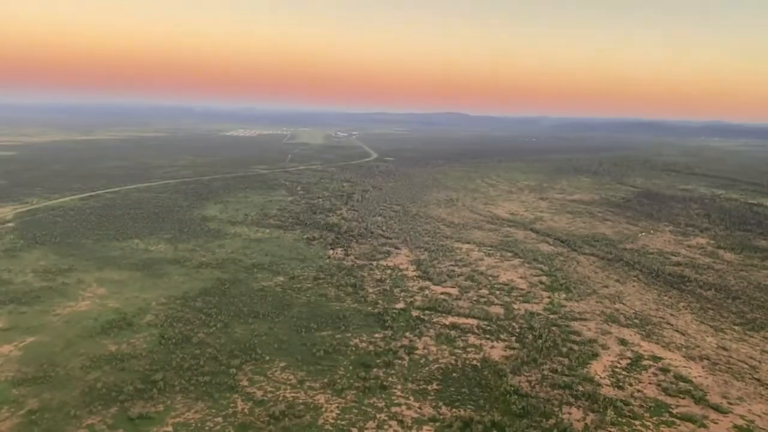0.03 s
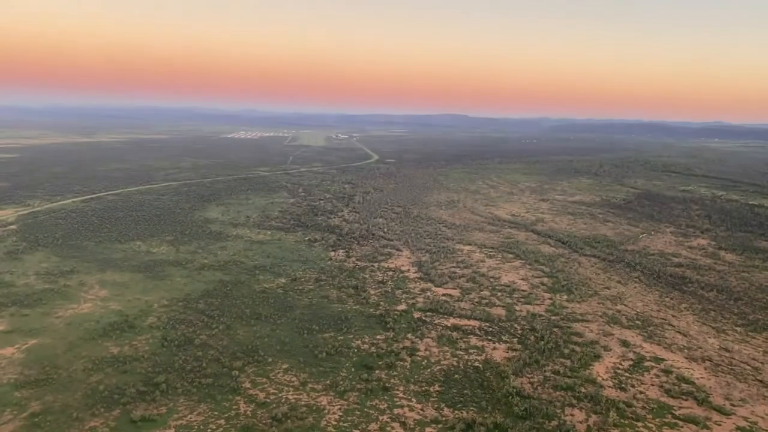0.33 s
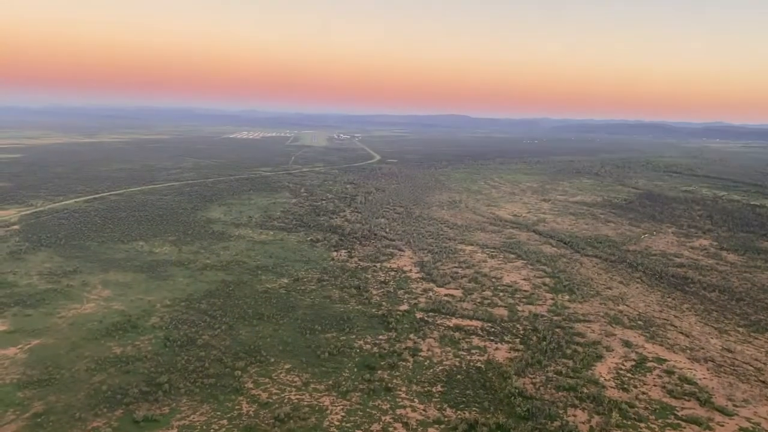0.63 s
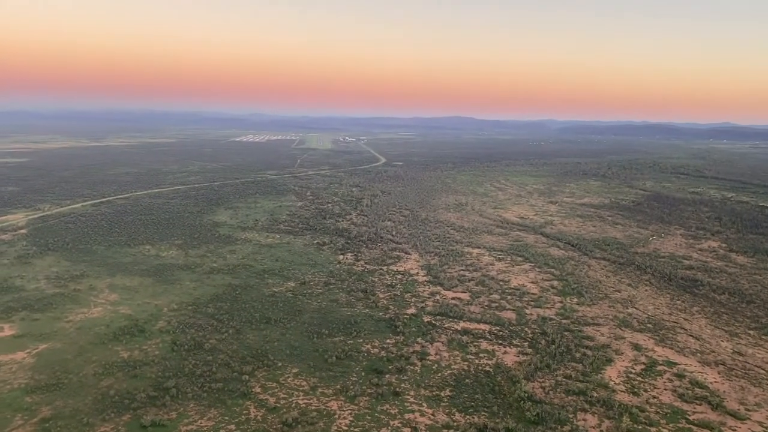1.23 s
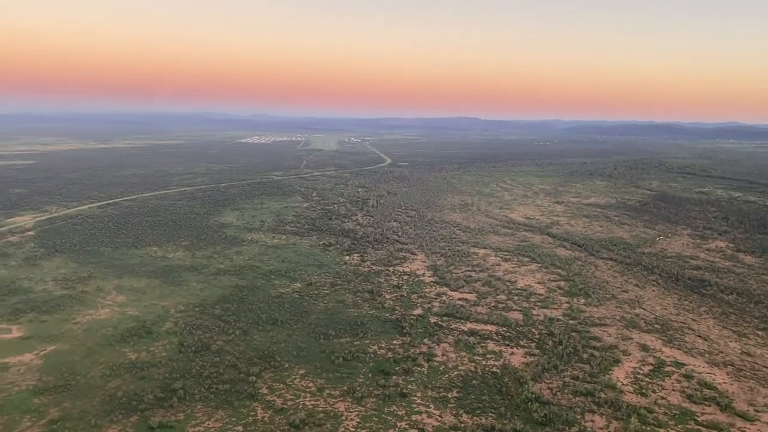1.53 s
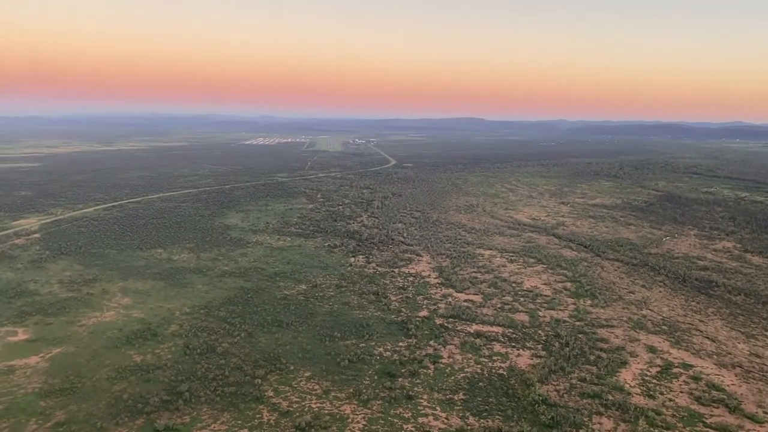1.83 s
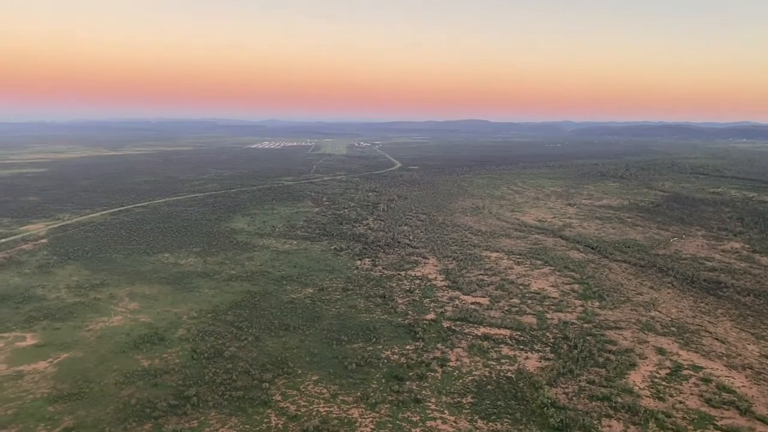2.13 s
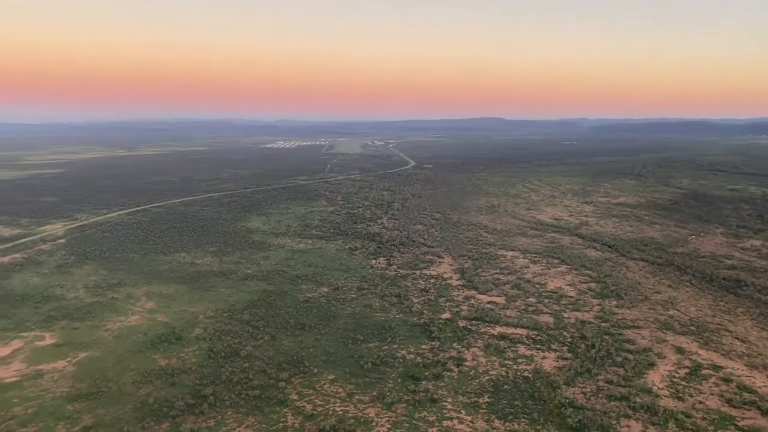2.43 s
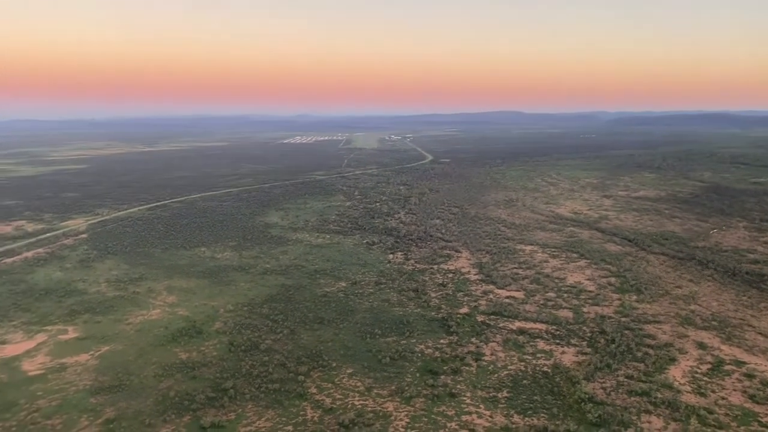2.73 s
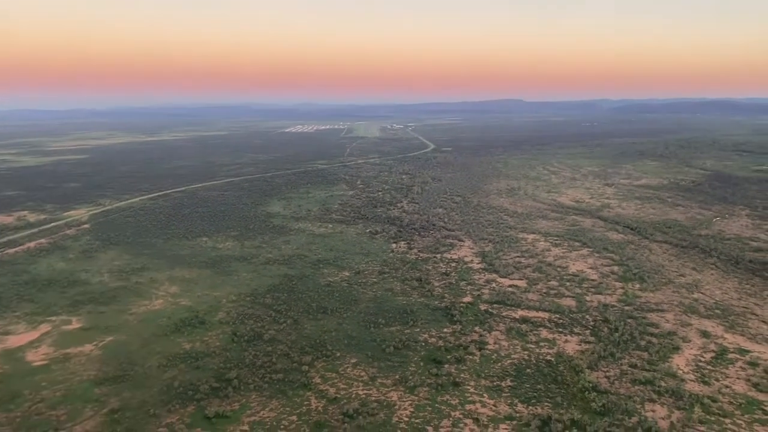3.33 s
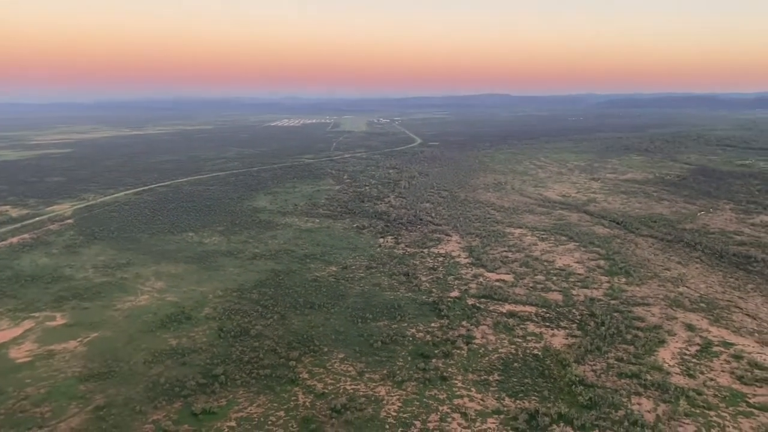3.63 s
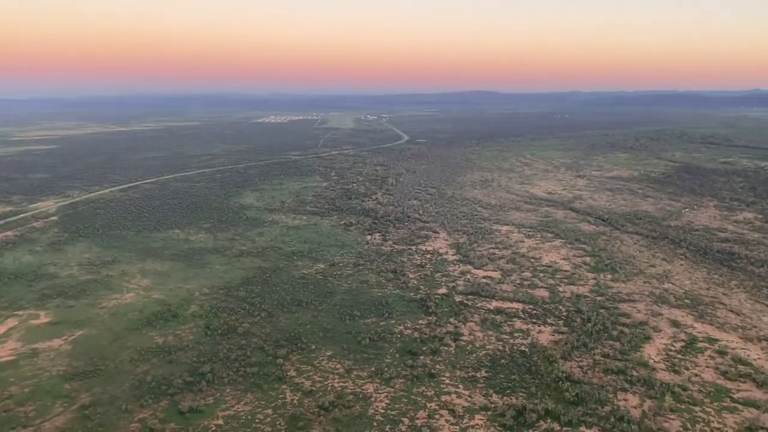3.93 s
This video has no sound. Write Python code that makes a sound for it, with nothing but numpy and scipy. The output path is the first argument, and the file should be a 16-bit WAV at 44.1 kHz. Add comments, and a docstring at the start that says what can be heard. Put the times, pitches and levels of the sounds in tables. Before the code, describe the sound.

A deep, broad roar of rushing air, like wind or a burner, holds for all 4 seconds high above open country, slightly louder on the right. Short, low buffets ripple through it, near 0.25 and 1 second and again between 1.5 and 2 seconds. A thin, bright hiss lies on top, with a faint, wavering whistle that swells slightly around 2 and 3.75 seconds. The overall level barely changes.

```python
"""A deep, steady roar of rushing air, high above open country, on a closely spaced pair of microphones.
Large eddies make the roar, with its broad resonances and buffets; fine turbulence lays a thin, bright
hiss over it, with a faint whistle. All swell and ease a little. The sound reaches the right microphone
first and is slightly louder there."""
import sys
import numpy as np
from scipy import signal
from scipy.fft import rfft, irfft
from scipy.io import wavfile
from scipy.ndimage import uniform_filter1d, map_coordinates

SR = 44100
rng = np.random.default_rng(int(sys.argv[2]) if len(sys.argv) > 2 else 0)


def store_wav(level_fs):
    """Save 16-bit WAV to argv[1]."""
    pcm = np.round(np.clip(np.atleast_2d(level_fs), -1, 1) * 32767)
    wavfile.write(sys.argv[1], SR, pcm.T.astype(np.int16))


N = 176400
TIME = np.arange(N) / SR
FREQS = np.maximum(np.arange(N // 2 + 1), 1) * SR / N
SIDES = np.array([[0.5], [-0.5]])  # shares a difference between left and right


def roar(rush_from_hz=292, hollow_from_hz=1040):
    """Large eddies: a buffeting bass, a rushing middle and a hollow resonance, each with its own swell."""
    # spectrum of the roar: f/Hz, level/dB
    spectrum = [(24,-66),(30,-54),(42,-44.5),(60,-36.5),(105,-42.5),(130,-37),(160,-38),(210,-42),(270,-41),(330,-45.5),(370,-43.5),(420,-47.5),(480,-43),(525,-47.5),(720,-48),(860,-50.5),(1035,-59),(1170,-54),(1320,-55),(1490,-61),(1620,-68.5),(1760,-71)]
    # swell of the bass: t/s, level/dB
    bass_level = [(0, 1.1), (0.45, -1), (0.75, -1), (0.88, -3), (1.05, -1.2), (1.48, -0.7), (1.58, -5.5),
                  (1.67, 1.5), (1.84, -2.2), (2.0, 0.5), (2.6, -2), (3.1, -0.5), (3.36, 0), (3.48, -2.8),
                  (3.6, -0.7), (4, -2)]
    # swell of the rushing middle: t/s, level/dB
    rush_level = [(0, -0.2), (0.36, 1.3), (0.5, 0.7), (1, -0.2), (1.48, 1.0), (1.75, -1.6), (1.95, 1.6),
                  (2.38, -1), (2.55, -0.8), (3.25, -0.2), (3.75, -0.6), (4, 0.5)]
    # swell of the hollow resonance: t/s, level/dB
    hollow_level = [(0, 2.5), (0.5, -0.2), (1.0, 0.2), (1.35, -1.5), (1.7, 1), (2.2, 0.9), (2.75, -1),
                    (3.2, -0.8), (3.7, 1), (4, -1)]
    flow = airflow(spectrum)
    lowpass = 1 / (1 + (FREQS / rush_from_hz) ** 6)
    highpass = 1 / (1 + (hollow_from_hz / np.maximum(FREQS, 10)) ** 20)
    middle = flow * (1 - lowpass) * (1 - highpass)
    bass = buffeting(flow * lowpass) * swell(bass_level) * undb(-0.5)
    rush = eddies(middle, spectrum, depth_db=1.26, rate_hz=29.68, count=12) * swell(rush_level)
    hollow = irfft(flow * highpass, N) * swell(hollow_level) * undb(-0.1)
    return (bass + rush + hollow) * undb(0.1)


def buffeting(flow, count=4, reach_octaves=0.46, even_s=0.24):
    """Bass bands, evened out over time, each lifted by the buffets near its frequency."""
    # strongest buffets: t/s, centre f/Hz, length/s, lift/dB
    buffets = [(0.018, 260, 0.083, 7), (0.25, 65, 0.065, 10), (0.76, 151, 0.09, 5), (0.983, 60, 0.11, 8),
               (1.156, 267, 0.29, 4.5), (1.516, 140, 0.084, 5.5), (1.693, 111, 0.12, 4),
               (1.923, 150, 0.066, 4.5), (2.017, 262, 0.15, 0.5), (2.1, 85, 0.13, 3.5), (2.3, 71, 0.049, 5),
               (2.827, 160, .12, 5), (3.082, 160, .12, 2.5)]
    centres_hz = np.geomspace(64, 253, count)
    bass = 0
    for centre, band in zip(centres_hz, split_bands(flow, centres_hz[0], centres_hz[-1], count)):
        power = np.mean(band ** 2, axis=0)
        evening_gain = np.sqrt(power.mean() / smooth(power, int(even_s * SR)))
        lift_db = 0
        for at, hz, length, db in buffets:
            nearness = bell(np.log2(centre / hz), reach_octaves)
            lift_db += db * nearness * bell(TIME - at, length / 2)
        bass += band * evening_gain * undb(lift_db)
    return bass


def hiss(edge_hz=2130, edge_reach_hz=480, dip_depth=0.37):
    """Fine turbulence: a fluttering hiss; its lower edge thins for a while and a narrow dip drifts."""
    # spectrum of the hiss: f/Hz, level/dB
    spectrum = [(1800,-78),(2080,-72.8),(2300,-73),(2600,-71),(2900,-73),(3300,-76.8),(3800,-76),(4500,-75),(5100,-77),(5600,-75.3),(6300,-74.7),(7200,-76.7),(8400,-69.2),(9000,-68.7),(9600,-70.6),(10200,-67.9),(11100,-71.2),(12000,-70.3),(13000,-72.2),(14200,-69.6),(15500,-68.6)]
    # swell of the whole hiss: t/s, level/dB
    hiss_level = [(0, 1.2), (0.55, -0.1), (1.3, 1), (1.75, 0.4), (2.35, 0.5), (2.7, -0.5), (3.05, 1),
                  (3.45, -0.5), (4, 0)]
    # swell of its lower edge, midway between the microphones: t/s, level/dB
    edge_level = [(0, 2), (0.35, -2), (0.9, 1), (1.5, 1), (2.05, 2.5), (2.35, -5.5), (2.9, -7), (3.4, -4),
                  (4, 3)]
    # centre of the dip: t/s, f/Hz
    dip_centre = [(0, 3400), (0.9, 3230), (2.05, 2830), (2.3, 3460), (3.1, 3300), (4, 3170)]
    air = eddies(airflow(spectrum), spectrum, depth_db=0.9, rate_hz=60, count=14)
    mono = air.mean(axis=0)
    edge = irfft(rfft(mono) * bell(FREQS - edge_hz, edge_reach_hz), N)
    dip = narrow_band(mono, over_time(dip_centre), width_hz=100)
    air = air + edge * (swell(edge_level) - 1) - dip_depth * dip
    flutter_db = 0.2 * wander(rate_hz=70)
    return air * swell(hiss_level) * undb(flutter_db - 0.04)


def whistle(pitch_hz=2490, waver=0.0087, level_db=-47.5, balance_trim_db=-0.5):
    """A faint, airy whistle a little to the left that wavers, swells and fades."""
    # swell of the whistle: t/s, level/dB
    whistle_level = [(0, 0), (0.7, -1), (1.3, -1), (2.05, 3.5), (2.35, -2), (3.3, -4), (3.75, 2), (4, 0)]
    air = irfft(airflow([(pitch_hz / 2, 0), (pitch_hz * 2, 0)]), N)
    wavering_hz = pitch_hz * (1 + waver * wander(rate_hz=4.1))
    tone = narrow_band(air, wavering_hz, width_hz=210)
    return tone / tone.std() * swell(whistle_level) * undb(level_db + SIDES * balance_trim_db)


def airflow(spectrum, travel_ms=0.25, skirt_db_per_octave=102):
    """Left and right spectra of turbulence of a given colour, as the two microphones receive it."""
    # sound each microphone has to itself, relative to what both share: f/Hz, level/dB
    unshared = [(60, -28), (160, -26), (320, -18), (800, -16), (1500, -11), (1900, -1), (2600, -2),
                (3300, -2), (4200, -9), (5400, -6), (8500, -7), (10000, -11), (12000, -14), (15000, -10)]
    # balance of the pair, left minus right: f/Hz, level/dB
    balance = [(40, 0.3), (150, -3), (340, -1.5), (470, -3.5), (800, -4), (1020, -2.5), (1220, -5),
               (1560, -1), (1800, -5), (2200, 3), (3200, -0.9), (5300, 0), (7400, -1.3), (8400, -5.5),
               (9800, 0)]
    # lead of the right microphone on top of the travel time: f/Hz, phase/rad
    extra_lead = [(60, .05), (500, .5), (1050, .7), (1350, .15), (1650, .6), (2000, -1.5), (2300, -.9),
                  (2550, .3), (3400, .5), (4900, -1.0), (5600, .5), (6500, 2.2), (8000, 2.8), (12000, 3.0),
                  (14500, 3.2)]
    shared, left, right = rfft(rng.standard_normal((3, N)))
    own_gain = undb(over_frequency(unshared))
    pair = (shared + own_gain * np.array([left, right])) / np.sqrt(1 + own_gain ** 2)
    lead = 2 * np.pi * FREQS * travel_ms / 1000 + over_frequency(extra_lead)
    pan = undb(SIDES * over_frequency(balance))
    pan /= np.sqrt(np.mean(pan ** 2, axis=0))
    octaves_outside = np.abs(np.log2(FREQS / np.clip(FREQS, spectrum[0][0], spectrum[-1][0])))
    colour = undb(over_frequency(spectrum) - skirt_db_per_octave * octaves_outside)
    return pair * pan * np.exp(-1j * SIDES * lead) * colour * np.sqrt(SR / 2)


def eddies(flow, spectrum, depth_db, rate_hz, count):
    """Turbulence makes each band of the flow flicker on its own."""
    bands = split_bands(flow, spectrum[0][0], spectrum[-1][0], count)
    return sum(band * undb(depth_db * wander(rate_hz)) for band in bands)


def split_bands(flow, low_hz, high_hz, count):
    """Waveforms of overlapping bands of the flow's spectra, evenly spaced in pitch."""
    place = np.interp(np.log(FREQS), np.log([low_hz, high_hz]), [0, count - 1])
    return [irfft(flow * np.maximum(1 - np.abs(place - k), 0), N) for k in range(count)]


def narrow_band(x, centre_hz, width_hz):
    """The part of x in a narrow band around a moving centre."""
    carrier = np.exp(2j * np.pi * np.cumsum(centre_hz) / SR)
    lowpass = signal.butter(1, width_hz / 2, fs=SR, output="sos")
    return 2 * np.real(signal.sosfiltfilt(lowpass, x / carrier, padtype="even") * carrier)


def wander(rate_hz):
    """Random levels, held and then smoothed; mean 0, spread 1."""
    hold = max(int(SR / rate_hz), 2)
    steps = rng.standard_normal(1024)[(np.arange(N) // hold) % 1024]
    curve = smooth(steps, hold)
    return (curve - curve.mean()) / curve.std()


def swell(table):
    """Gain with rms 1 from points of t/s, level/dB."""
    gain = undb(over_time(table))
    return gain / np.sqrt(np.mean(gain ** 2))


def over_time(table):
    """Join points of t/s, value with straight lines."""
    return np.interp(TIME, *np.array(table, float).T)


def over_frequency(table):
    """Join points of f/Hz, value along a log-frequency axis."""
    hz, value = np.array(table, float).T
    return np.interp(np.log(FREQS), np.log(hz), value)


def smooth(x, samples):
    """A moving average, applied twice."""
    return uniform_filter1d(uniform_filter1d(x, samples), samples)


def bell(offset, reach):
    """A Gaussian hump of height 1."""
    return np.exp(-(offset / reach) ** 2)


def undb(db):
    """Decibels to gain."""
    return 10 ** (np.asarray(db) / 20)


def scene():
    """Roar, hiss and whistle reach the pair from a direction that wanders slightly."""
    # extra delay at the left microphone as the direction wanders: t/s, delay/ms
    lag_drift = [(0, 0.0023), (2.0, 0.0021), (2.6, 0.0046), (3.1, 0.0044), (4, 0)]
    left, right = roar() + hiss() + whistle()
    lag_s = over_time(lag_drift) / 1000
    late_left = map_coordinates(left, [(TIME - lag_s) * SR], order=5, mode="mirror")
    return np.array([late_left, right])


def record(dry, top_hz=15700):
    """The recorder rounds the largest peaks towards full scale and cuts the top steeply."""
    rounded = dry / (1 + dry ** 8) ** (1 / 8)
    lowpass = signal.ellip(12, 0.1, 90, top_hz, fs=SR, output="sos")
    return signal.sosfilt(lowpass, rounded)


dry = scene()
out = record(dry)
store_wav(out)
```